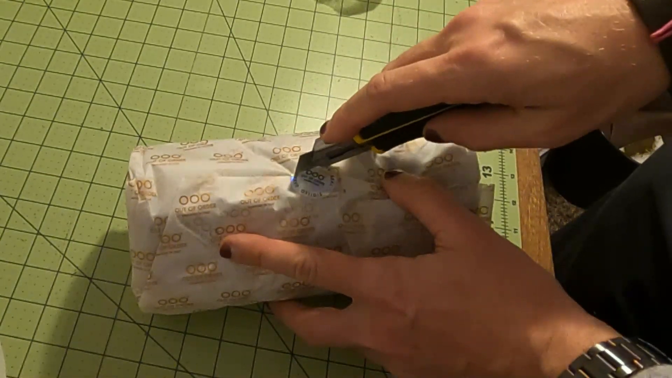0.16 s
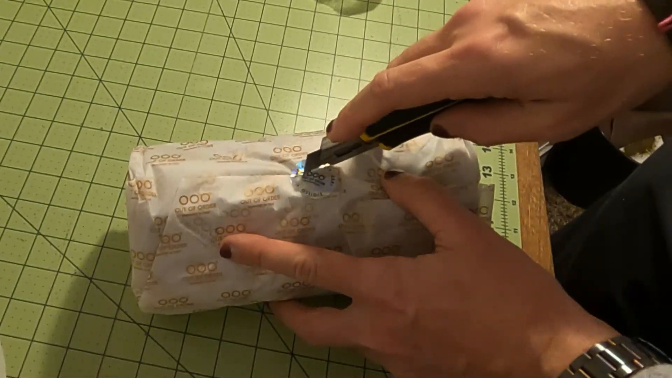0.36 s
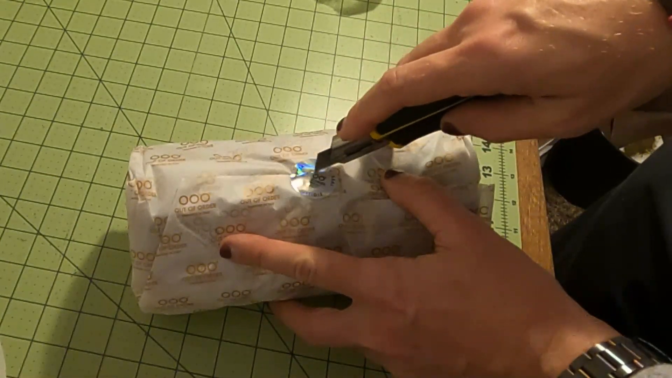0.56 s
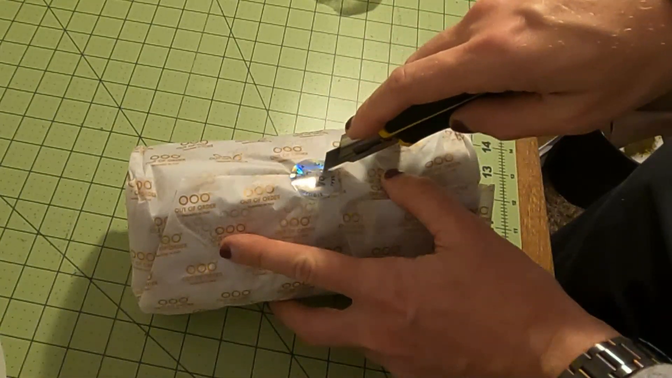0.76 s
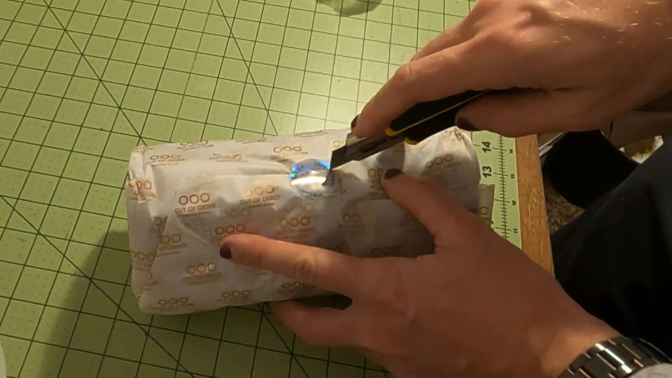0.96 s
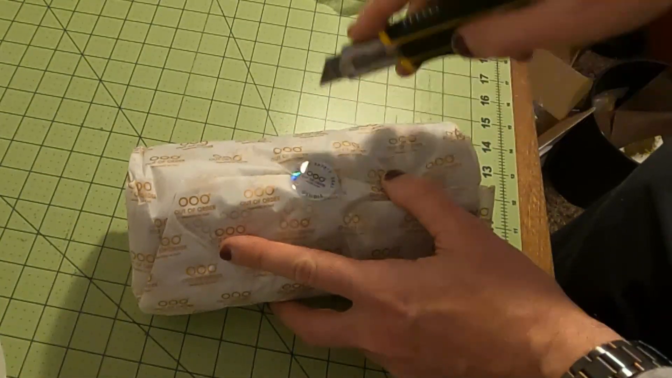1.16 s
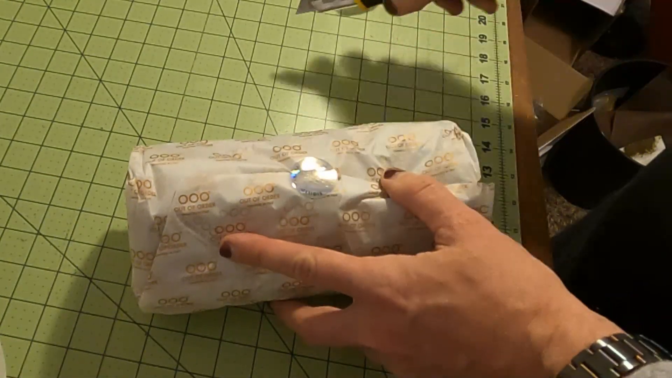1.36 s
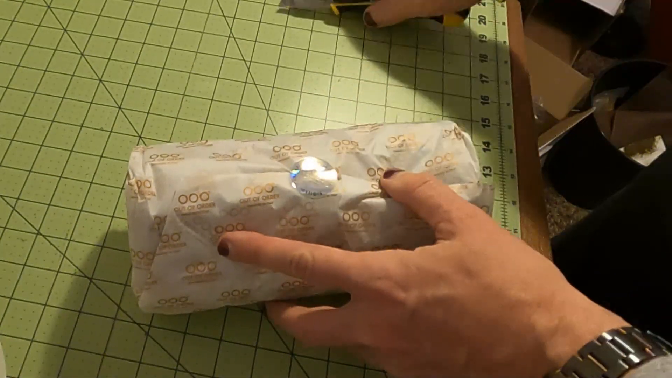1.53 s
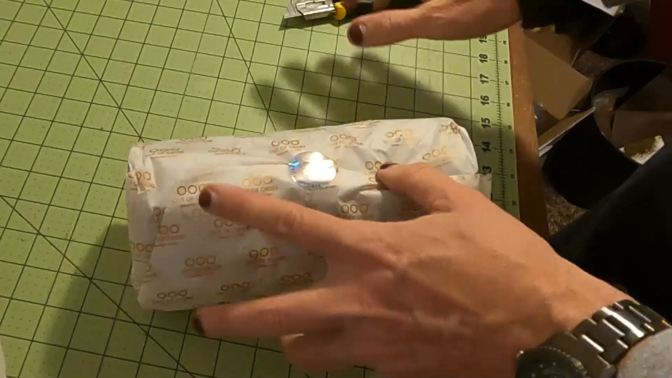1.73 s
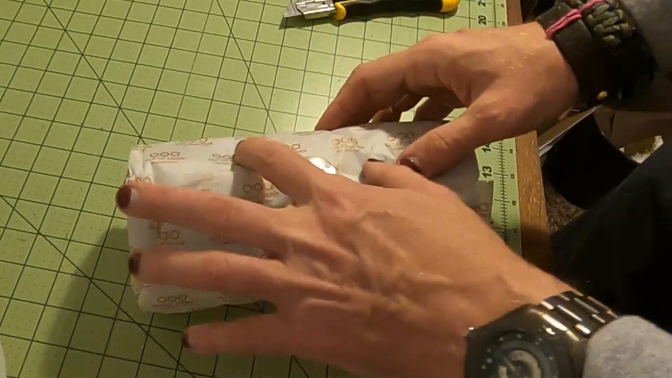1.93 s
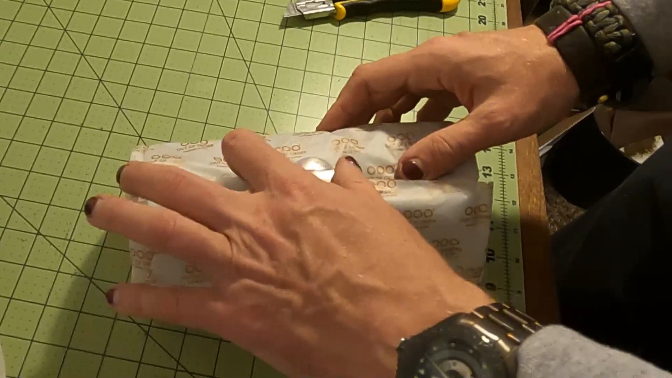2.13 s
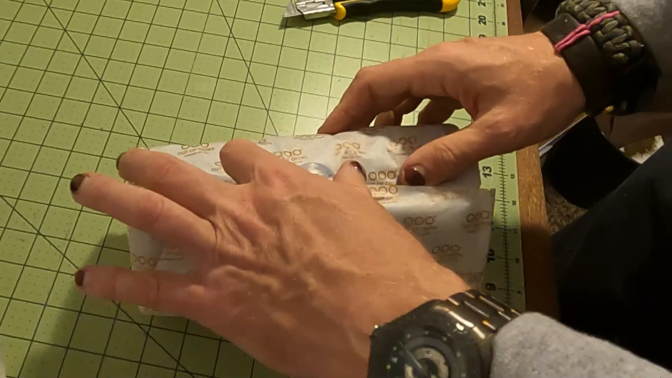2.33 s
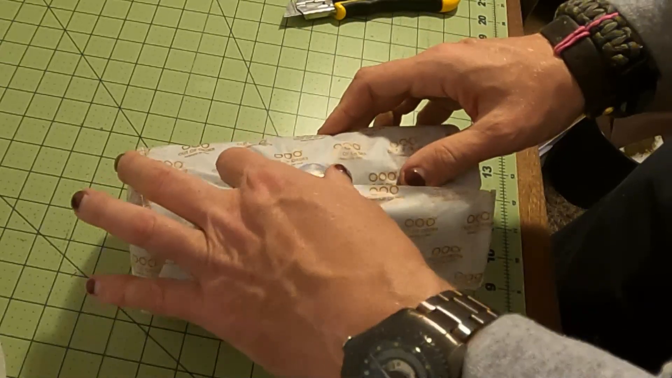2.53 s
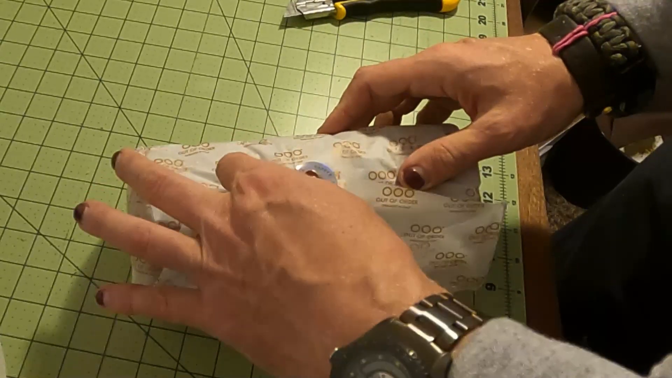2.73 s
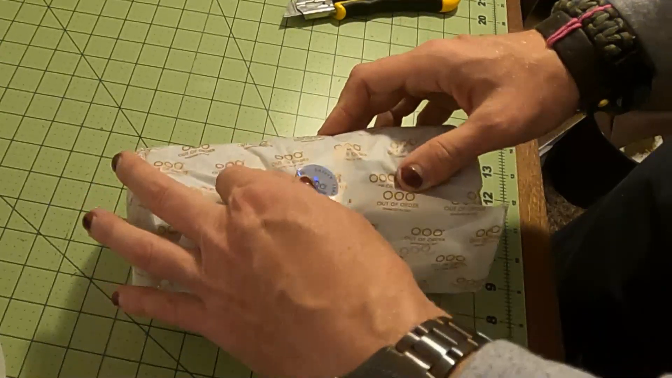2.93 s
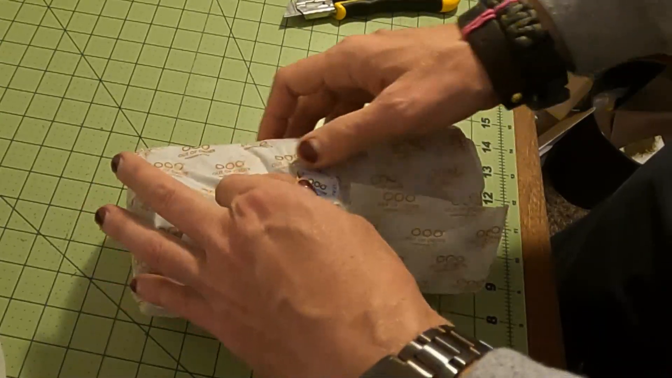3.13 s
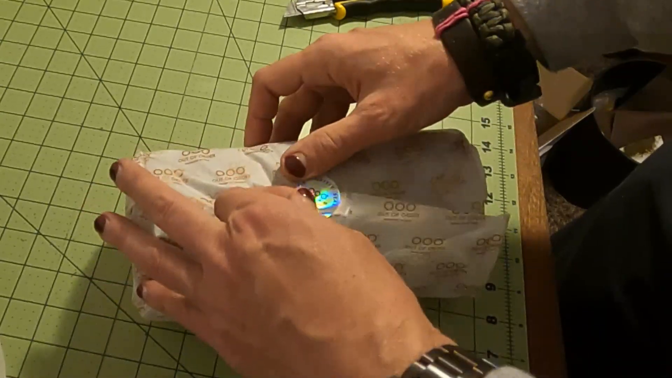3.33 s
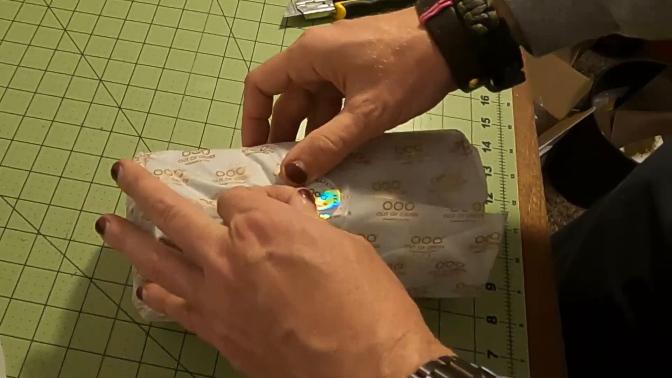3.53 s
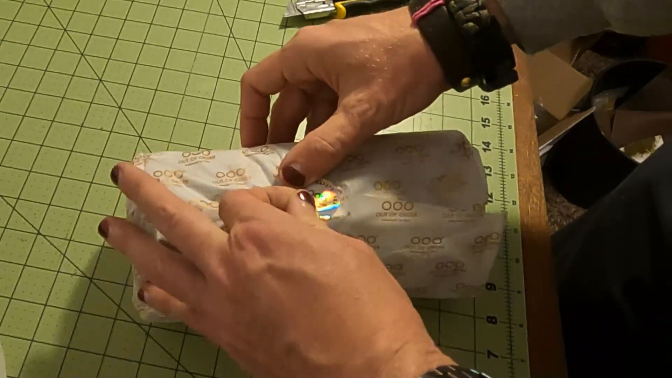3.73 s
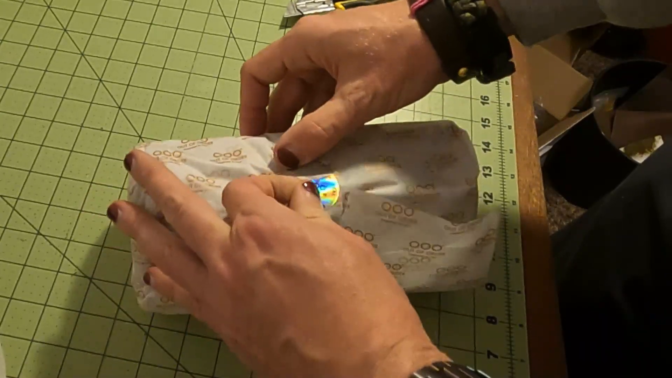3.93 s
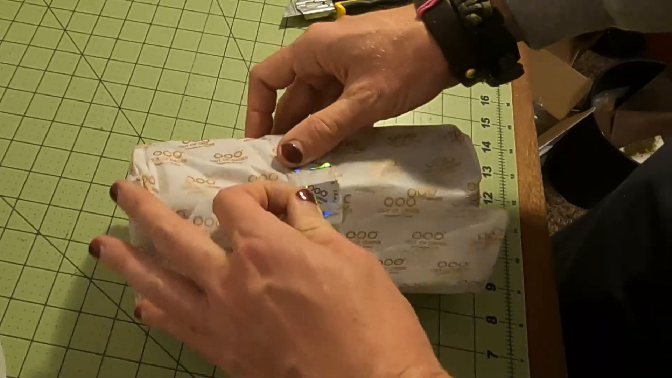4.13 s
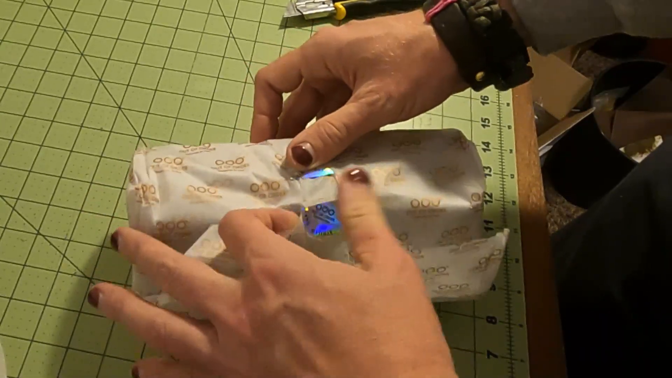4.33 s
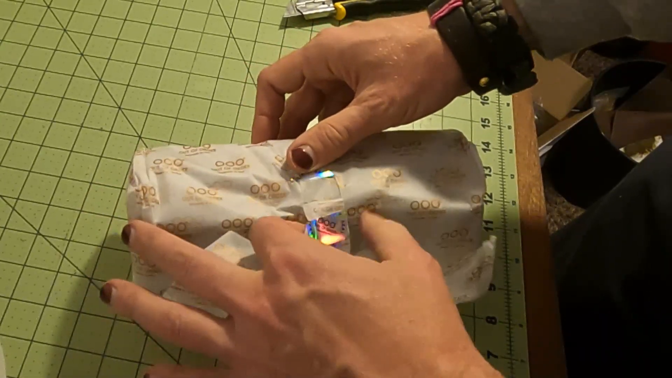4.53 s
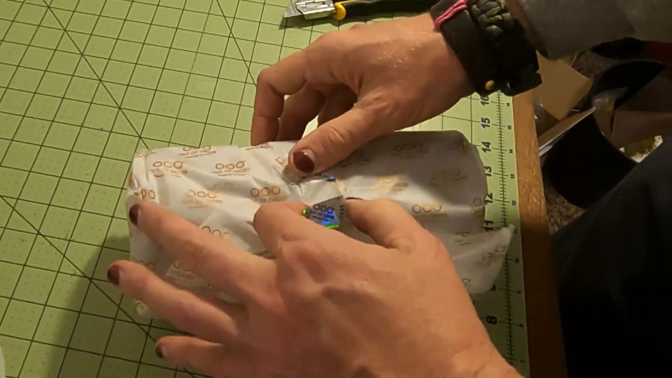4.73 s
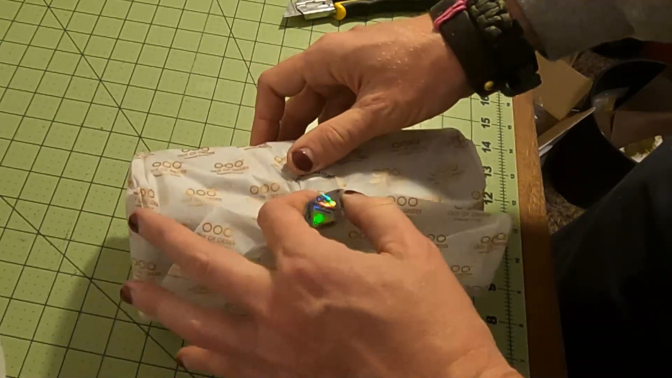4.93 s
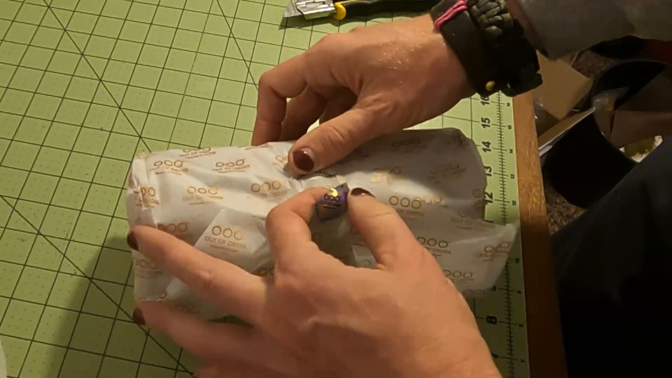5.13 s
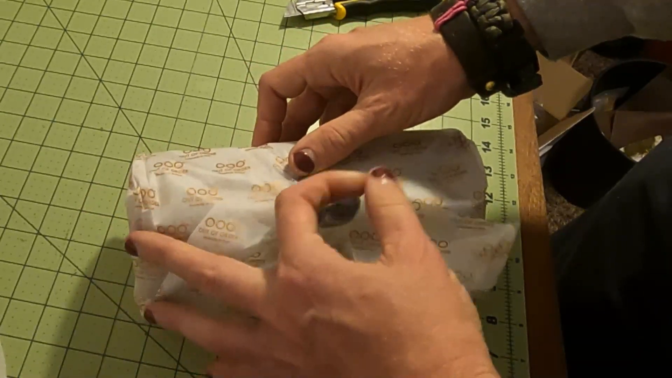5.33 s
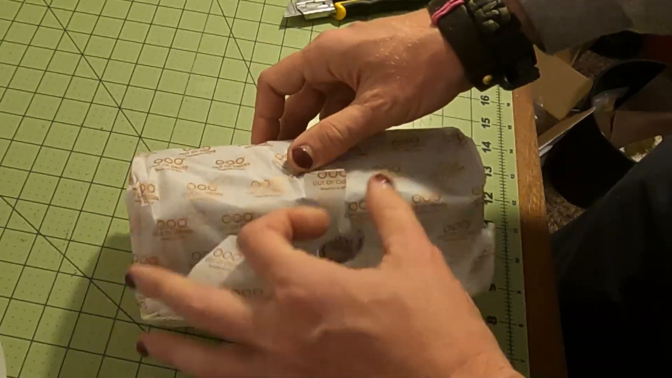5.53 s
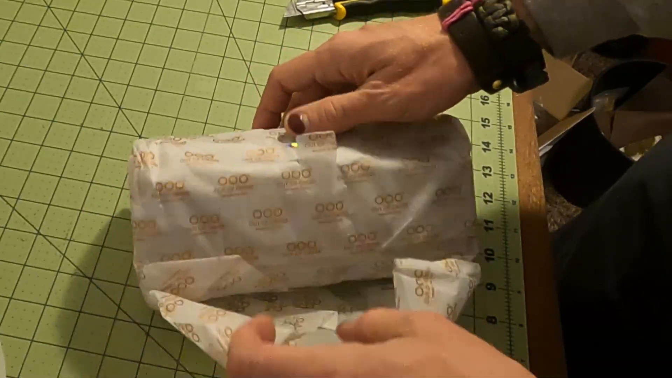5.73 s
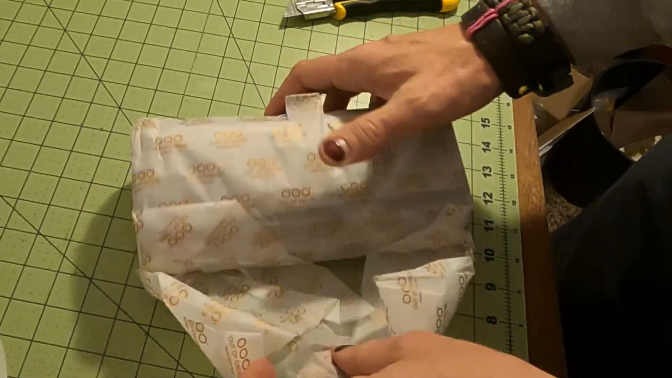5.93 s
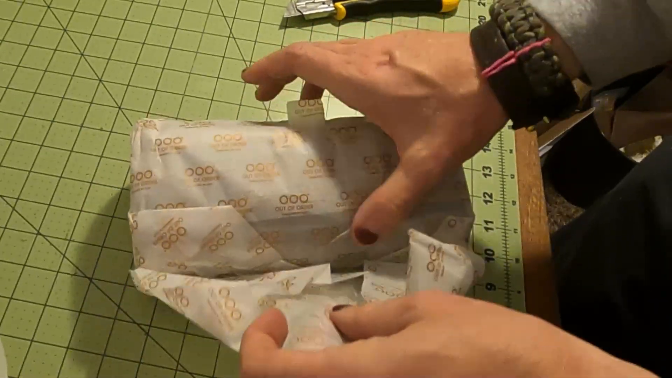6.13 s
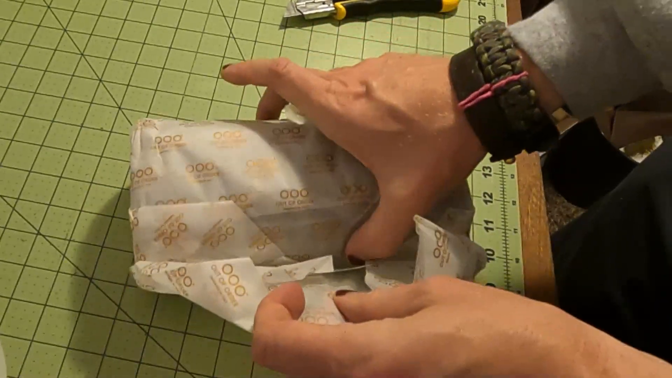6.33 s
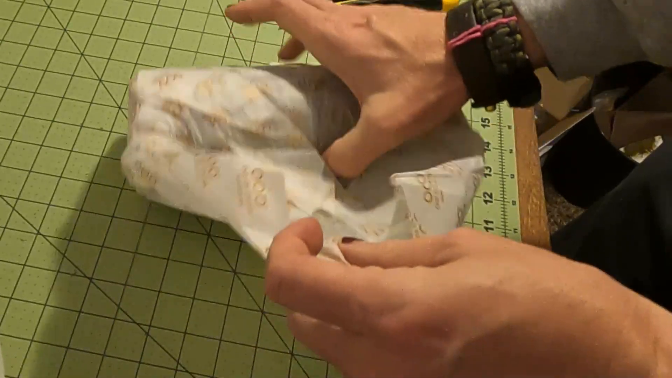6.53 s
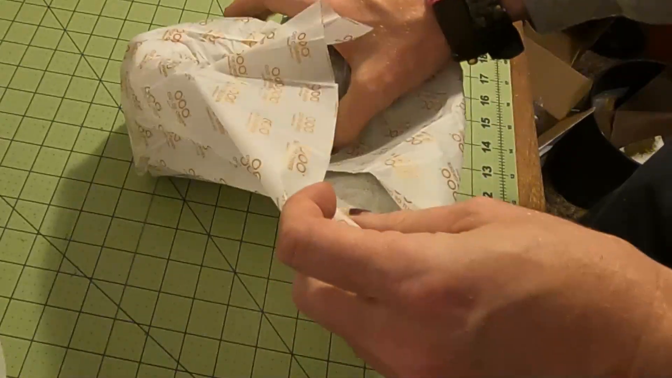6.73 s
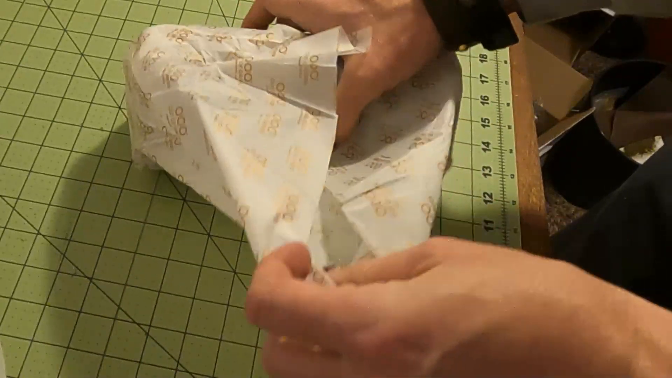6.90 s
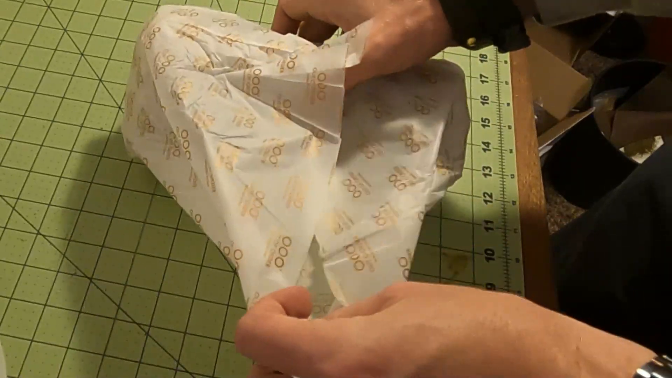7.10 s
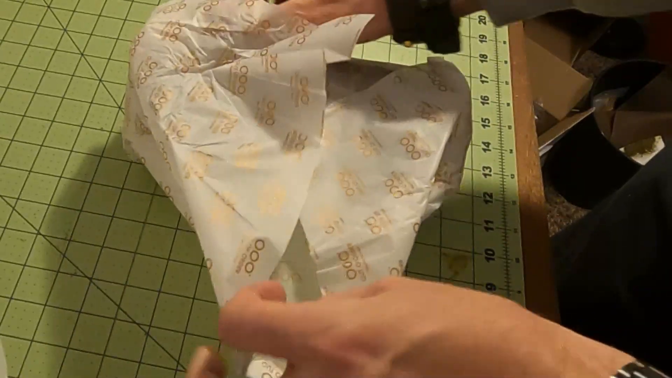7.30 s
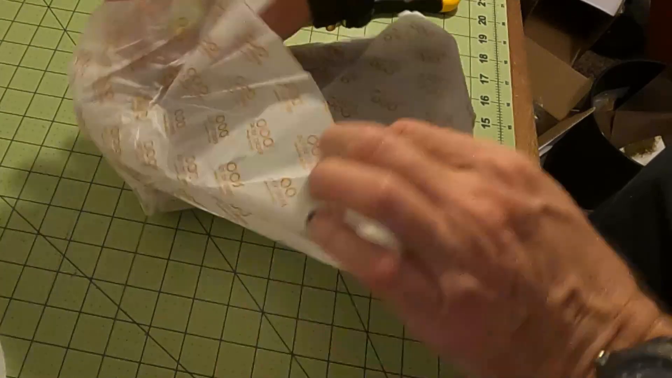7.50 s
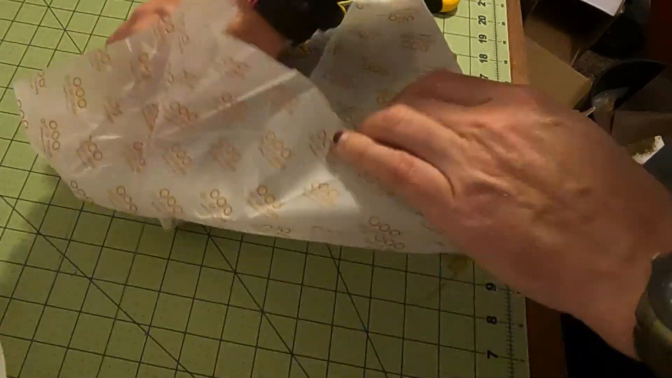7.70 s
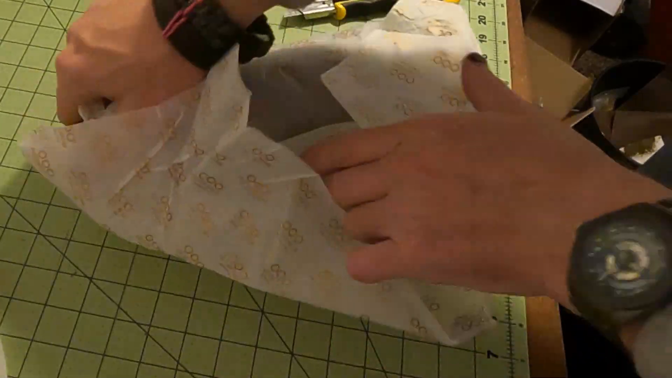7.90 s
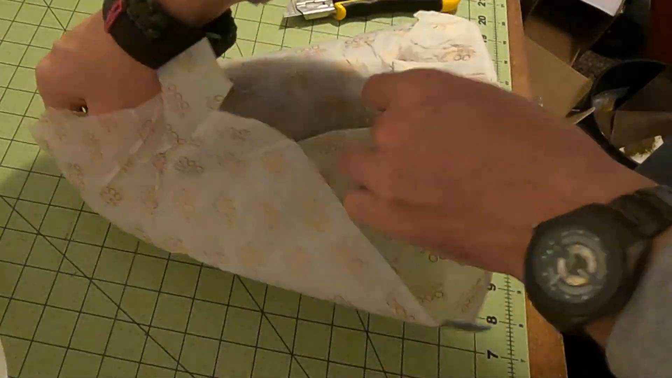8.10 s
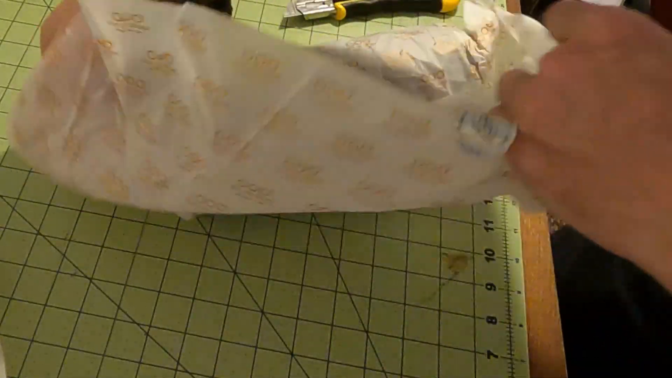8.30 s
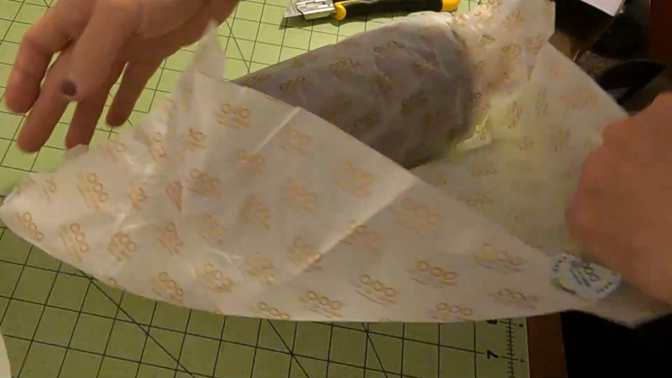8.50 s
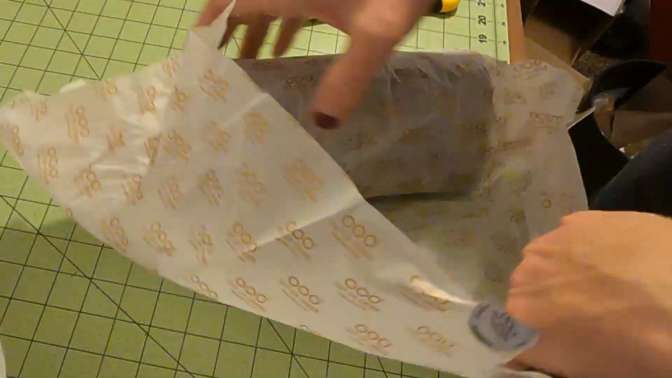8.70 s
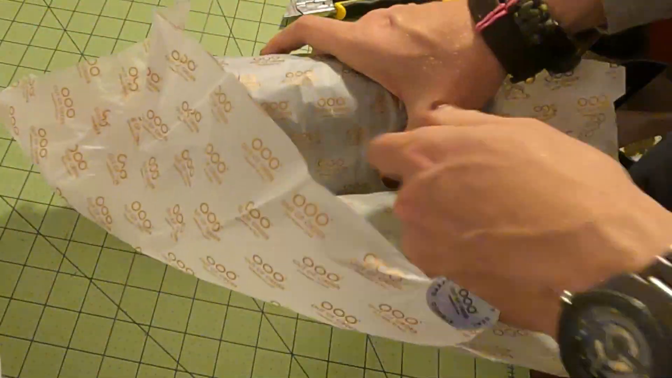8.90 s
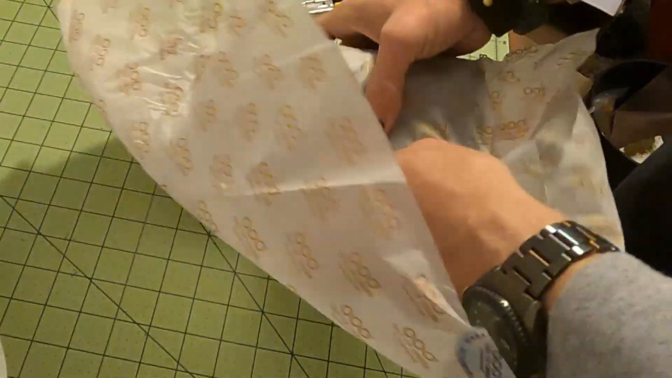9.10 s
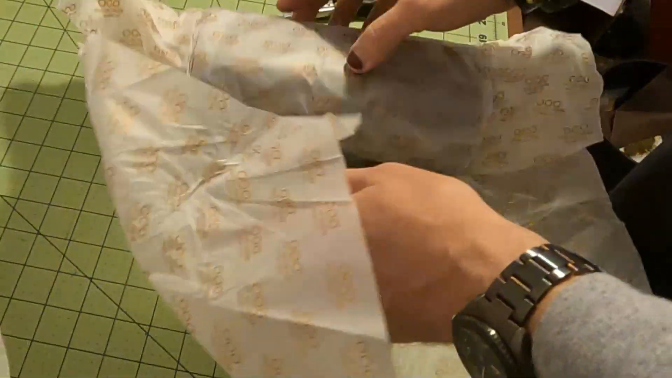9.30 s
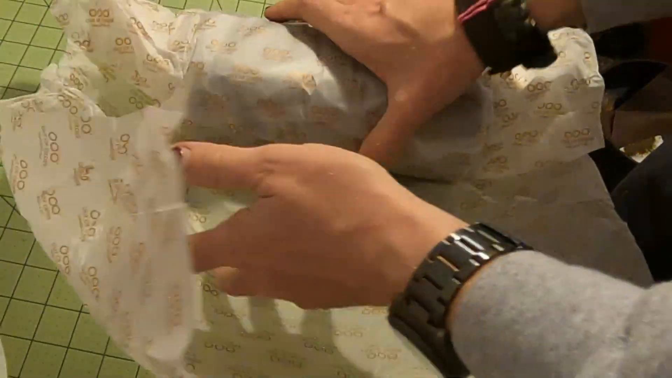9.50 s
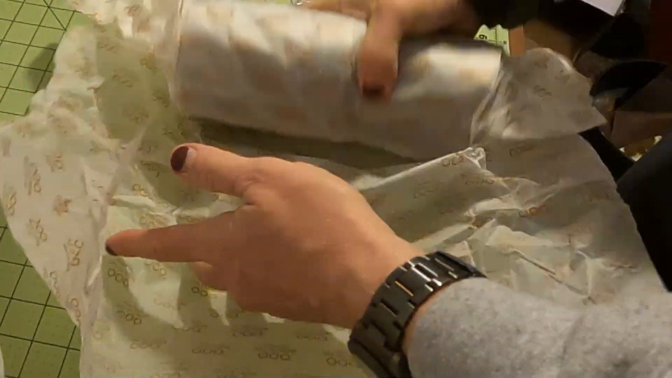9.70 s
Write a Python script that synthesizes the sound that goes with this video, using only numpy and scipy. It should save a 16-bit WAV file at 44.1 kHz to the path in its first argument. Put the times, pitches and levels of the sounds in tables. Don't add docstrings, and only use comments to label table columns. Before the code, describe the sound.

A small quiet room, heard very close in stereo, with soft ventilation and a low machine hum, deepest at the start and soon fading to a faint drone. From 0 to 1.2 s a blade slits tissue paper: light scratchy rasps and scattered crisp ticks. After a near-pause, at about 1.6 to 1.9 s the knife is laid down in a rapid rattle of hard clicks and woody table knocks, the loudest contacts here. From 2 to 3.8 s fingers pick at the paper with sparse dry crackles. A sharp snap and small knock at 3.9 s begin brisker peeling, with bright pops until 5.6 s. Then the sheet is pulled open: full, loud crinkles and sweeping rustles in quick successive gestures, dense with snaps, continuing to the end near 9.75 s. Dull, low table bumps fall around 6.6, 7.1 and 9.3 s.

```python
import sys
import numpy as np
from scipy import signal
from scipy.fft import rfft, irfft
from scipy.io import wavfile
from scipy.ndimage import uniform_filter1d

SR = 44100
rng = np.random.default_rng(int(sys.argv[2]) if len(sys.argv) > 2 else 0)


def attenuation_scalar(level_db):
    decades = np.asarray(level_db, float) / 20
    return 10 ** decades


def to_wav(s):
    ch = np.atleast_2d(s).T
    pcm = np.round(np.clip(ch, -1, 1) * 32767)
    wavfile.write(sys.argv[1], SR, pcm.astype(np.int16))


N = 429975

# start_s,
# length_s, start_level_db, end_level_db
SLITS = [(0.0, 0.015, -33, -49), (0.055, 0.13, -43.5, -47.5), (0.239, .03, -38, -51),
         (0.37, 0.052, -47.5, -44), (0.43, 0.078, -34.5, -39.5), (0.522, 0.08, -41, -37.5),
         (0.656, 0.15, -43.5, -44.5), (0.88, 0.036, -41.5, -44), (0.966, 0.069, -49, -40),
         (1.103, 0.032, -44, -36.5), (1.565, 0.06, -40, -34), (1.674, .04, -33, -37),
         (1.732, 0.062, -33, -35.5), (1.854, 0.046, -33.5, -47)]
# start_s, length_s, start_level_db, end_level_db
PICKS = [(1.959, 0.11, -34.5, -36), (2.107, 0.22, -39, -30.5), (2.304, 0.045, -28.5, -39),
         (2.454, 0.024, -30.5, -32.5), (2.571, 0.17, -31.5, -40.5), (3.045, 0.25, -35.5, -43),
         (3.282, 0.059, -34.5, -36), (3.45, 0.04, -43, -43), (3.623, 0.067, -39, -31.5),
         (3.887, 0.09, -25, -27.5), (4.01, 0.099, -35, -35), (4.147, 0.11, -25.5, -26.5),
         (4.287, 0.12, -33.5, -37), (4.573, 0.08, -43, -34), (4.715, 0.024, -22.5, -25.5),
         (4.822, 0.059, -27.5, -42), (4.943, 0.033, -36, -35), (5.065, 0.24, -33, -36),
         (5.367, 0.074, -27, -27.5), (5.491, 0.044, -31.5, -36), (5.542, 0.056, -32.5, -28.5)]
# start_s, length_s, start_level_db, end_level_db
PULLS = [(5.647, 0.13, -38, -31), (5.797, 0.041, -28.5, -22), (5.944, 0.11, -25.5, -21.5),
         (6.1, 0.14, -26, -28), (6.363, 0.24, -41.5, -23.5), (6.509, 0.12, -31.5, -21),
         (6.65, 0.17, -21, -24.5), (6.895, 0.18, -25.5, -19.5), (7.087, 0.12, -27, -31),
         (7.245, 0.029, -25, -26), (7.51, 0.26, -30, -25.5), (7.82, 0.041, -22, -18.5),
         (7.896, 0.1, -21.5, -26.5), (8.008, 0.092, -26, -20.5), (8.154, 0.18, -22.5, -26.5),
         (8.33, 0.17, -22.5, -22), (8.52, 0.17, -26.5, -24.5), (8.768, 0.14, -25.5, -25.5),
         (9.068, 0.02, -27.5, -24.5), (9.105, 0.16, -20, -20), (9.308, 0.12, -21, -24),
         (9.46, .10, -28.5, -27.5), (9.62, 0.067, -26.5, -29.5), (9.708, 0.061, -22.5, -20.5)]
# time_s, creep_db, boom_db, crisp_top_db
SHEET = [(0, -49, -17, -10), (.35, -57, -16, -11.5), (.7, -51, -6, -9), (1.2, -61, -5.5, -10.5),
         (1.5, -54, -3, -14), (1.9, -58, -8, -12), (2.1, -43, -11.5, -9.5), (3.0, -42.5, -13.5, -8),
         (3.8, -39.5, -14.5, -8), (4.5, -42.5, -12.5, -9.5), (5.6, -38, -14.5, -7), (6.4, -33.5, -9.5, -8),
         (7.4, -28.5, -13.5, -8), (8.1, -29, -9, -8.5), (9.0, -29, -12.5, -9.5), (9.75, -37, -10.5, -6.5)]
# pitch_hz, level_db
PAPER = [(120, -32), (200, -7), (380, -7.5), (700, -4.5), (1020, 6), (1300, -0.5), (2200, 1), (3660, 5.5),
         (7000, 2.5), (16000, -6.5)]
# pitch_hz, side_minus_mid_db
PORTS = [(60, -17), (110, -25), (200, -12), (380, -14.5), (700, -11), (1290, -15), (2380, -10),
         (4400, -10.5), (8120, -14), (15000, 2)]
# middle_s, length_s, level_db, pitch_hz
FACETS = [(0.006, 0.043, -46, 2240), (0.09, 0.068, -50, 8000), (0.448, 0.048, -60, 7900),
          (0.577, 0.32, -53, 520), (0.674, 0.042, -42, 3500), (1.128, 0.085, -47, 2520),
          (1.24, 0.15, -58, 1000), (1.418, 0.146, -61, 905), (2.03, 0.15, -54, 8100),
          (2.197, 0.066, -39, 2600), (2.308, 0.15, -48, 2870), (2.514, 0.22, -52, 3260),
          (2.712, 0.13, -50, 8000), (2.89, 0.055, -46, 6350), (3.188, 0.13, -46, 7600),
          (3.393, 0.074, -65, 890), (3.474, 0.071, -48, 8000), (3.625, 0.067, -51, 5040),
          (3.685, 0.038, -44, 2020), (4.207, 0.079, -35, 2350), (4.405, 0.05, -54, 4490),
          (4.513, 0.051, -63, 630), (4.623, 0.11, -45, 2660), (4.814, 0.072, -49, 630),
          (4.92, 0.085, -47, 1810), (5.027, 0.059, -52, 500), (5.155, 0.052, -54, 8000),
          (5.419, 0.05, -43, 566), (5.554, 0.055, -31, 8150), (5.857, 0.26, -38.5, 2400),
          (6.062, 0.037, -42, 850), (6.3, 0.15, -49, 635), (6.42, 0.076, -51, 1000),
          (6.898, 0.088, -54, 500), (7.25, 0.116, -40, 7850), (7.432, 0.037, -41, 720),
          (7.582, 0.082, -43, 523), (7.648, 0.037, -37, 1280), (7.726, 0.075, -43, 720),
          (7.932, 0.084, -35, 1640), (8.102, 0.04, -37, 665), (8.27, 0.088, -37, 2040),
          (8.336, 0.12, -49, 810), (8.599, 0.09, -44, 3560), (9.27, 0.041, -45, 495),
          (9.553, 0.074, -48, 500), (9.724, 0.084, -43, 500)]
# start_s, peak_db, pitch_hz
SNAPS = [(0.0473, -25.5, 2200), (0.0926, -16, 2880), (0.2233, -21, 3820), (0.301, -30, 2920),
                (0.456, -17, 5320), (0.5325, -35, 3560), (0.6647, -26, 3680), (0.992, -30, 2720),
                (1.1022, -27, 2730), (1.1168, -21, 3330), (1.28, -39, 1610), (1.296, -33.5, 4140),
                (1.6314, -18, 1960), (1.675, -20, 3350), (1.7333, -18, 2580), (1.762, -14, 1720),
                (1.84, -15, 2200), (0.548, -24, 2300), (0.671, -27, 3480), (0.838, -35, 3600),
                (0.905, -30, 2200), (1.009, -34, 2400), (1.93, -48, 3150), (1.9508, -17.5, 2890),
                (2.0179, -17, 3800), (2.158, -25, 3930), (2.2016, -21, 3220), (2.2482, -19, 3700),
              (2.266, -20, 2870), (2.2907, -27, 2800), (2.427, -28, 2770), (2.4643, -26, 4580),
              (2.491, -18.5, 3270), (2.5513, -28, 3170), (2.67, -21, 6350), (2.712, -28, 2140),
              (2.797, -29, 3750), (2.84, -24, 3520), (2.8772, -22, 5890), (2.937, -25, 7310),
              (3.2743, -24, 5120), (3.538, -19, 4860), (3.5947, -31, 5110), (3.6281, -20, 4510),
              (3.734, -23, 2900), (3.7638, -26, 4130),
                (3.864, -7.5, 2900), (3.922, -16, 4200), (3.9668, -21, 3000), (4.027, -24, 2900),
              (4.1171, -21, 3400), (4.136, -12.5, 3600), (4.326, -19, 3570), (4.404, -19.5, 4600),
              (4.4783, -23, 3050), (4.507, -22.5, 5740), (4.531, -23, 5800), (4.5577, -24, 3960),
              (4.607, -20, 2760), (4.618, -12.5, 2780), (4.6446, -22, 4130), (4.7003, -13.5, 3500),
              (4.791, -17, 4000), (4.8645, -21, 2780), (5.033, -22.5, 3470), (5.068, -16, 3010),
              (5.099, -22, 3760), (5.1296, -18, 4990), (5.1538, -6.5, 7300), (5.2226, -16.5, 4950),
              (5.245, -16, 3360), (5.296, -20, 3300), (5.349, -17.5, 3360), (5.398, -21, 3600),
              (5.417, -13, 4250), (5.506, -19.5, 4480), (5.543, -15, 3770), (5.5717, -12.5, 6400),
                (5.6015, -22, 3360), (5.6333, -23, 4740), (5.639, -23.5, 2630), (5.7154, -14.5, 4480),
              (5.773, -21, 3140), (5.8408, -18, 2170), (5.89, -10.5, 5640), (5.9646, -12, 2670),
              (6.0491, -10, 4150), (6.1033, -11, 4740), (6.1302, -13, 3060), (6.1472, -13, 3620),
              (6.1914, -22, 5040), (6.211, -22, 2840), (6.2267, -29, 2930), (6.2355, -30, 2840),
              (6.2507, -16, 6040), (6.2753, -19.5, 2410), (6.3048, -17, 5730), (6.3117, -19, 5250),
              (6.3423, -26, 3620), (6.3505, -21, 3140), (6.3588, -11.5, 6240), (6.374, -18, 7150),
              (6.3941, -21, 9100), (6.4246, -14.5, 1340), (6.4376, -20, 5510), (6.4954, -17, 7150),
              (6.5211, -15, 7150), (6.667, -7.5, 6630), (6.881, -17, 3360), (7.1087, -13, 5640),
              (7.1342, -19, 4570), (7.1429, -24, 3960), (7.222, -16, 6800), (7.2532, -15, 5860),
              (7.2601, -19, 3700), (7.3317, -24, 7190), (7.3612, -22, 2110), (7.4008, -21, 5600),
              (7.5161, -15, 5170), (7.916, -11, 3230), (7.9583, -7, 1730), (8.033, -9, 4630),
              (8.043, -15, 3100), (8.2354, -33, 2280), (8.25, -19, 2150), (8.272, -17, 4740),
              (8.6257, -10.5, 7190), (8.656, -20, 4800), (8.738, -14, 4260), (8.8216, -11, 3920),
              (9.0848, -15, 4610), (9.0927, -21, 4910), (9.4602, -13, 4600), (9.53, -14, 4690),
              (9.545, -13.5, 3230), (9.644, -15, 5300), (9.6746, -11, 5120), (9.7021, -16, 5210),
                (4.457, -25, 3000),
    (4.568, -24, 4000),
    (4.578, -21.5, 3000),
    (4.693, -20, 5000),
    (6.065, -5, 1700),
    (6.072, -16, 3500),
    (5.99, -14, 1700),
]
# time_s, level_db, pitch_hz
DRONE = [(0, -39, 61.6), (.35, -29.5, 61.2), (.95, -39, 60.5), (1.5, -34, 59.83), (2.4, -55, 60),
         (2.9, -44.5, 60.1), (4.2, -47, 60.3), (5.6, -50.5, 60.6), (7.1, -44, 64.9), (7.6, -48, 64.9),
         (9.0, -42, 64.9), (9.75, -53, 64.9)]
# pitch_hz, width_hz
DRONES = [
    (62, 2.5),
    (98, 4.4),
    (119.5, 2.2),
]
# pitch_hz, level_db
FAINT = [(80, -52), (140, -58), (162, -57), (221, -63.5)]
# middle_s, rumble_db
BUMPS = [
    (1.75, -27),
    (2.1, -66),
    (3.92, -48),
    (5.5, -47),
    (6.2, -53),
    (7.1, -38),
    (8.6, -59),
    (9.3, -36),
]
# pitch_hz, level_db
AIR = [(76, -35), (130, 10), (201, -17), (312, -9), (437, -22.5), (502, -21), (663, -29), (1050, -20),
       (1750, -23), (1900, -28), (5030, -72), (12100, -111), (15000, -77)]
# start_s, peak_db, pitch_hz, ring_time_s (60 dB)
CLACKS = [(1.8, -17, 1100, 0.012), (1.6334, -19, 2900, 0.006), (1.633, -17.5, 5200, .006),
          (1.6754, -7, 3500, 0.0059), (1.6744, -14.5, 5700, 0.0046), (1.6752, -34, 900, .006),
          (1.709, -18, 3600, 0.0068), (1.7319, -12, 2620, 0.0052), (1.733, -24, 4500, .006),
          (1.7346, -7, 640, 0.0079), (1.76, -14, 2540, 0.0058), (1.7597, -23, 4400, 0.0055),
          (1.759, -18.5, 5200, 0.0065), (1.761, -18, 7400, 0.0046), (1.7608, -5, 520, 0.0075),
          (1.6, -33, 1350, 0.0074), (1.6, -25, 3400, 0.0063), (1.6, -21, 2000, 0.0082),
          (3.8637, -20, 3060, .007), (3.8634, -19, 1450, 0.019), (3.8653, -12, 302, 0.027),
          (3.8638, -18.5, 560, 0.019), (5.4268, -21.5, 450, 0.014), (5.4257, -16.5, 950, 0.01),
          (4.5, -18, 2800, 0.0067), (9.507, -35, 328, 0.23), (1.7445, -13, 244, 0.056),
          (1.7915, -9, 140, .05), (3.886, -25.5, 164, 0.17)]
# pitch_hz, level_db, ring_time_s (60 dB)
HANDLE = [(820, -6, .015), (1040, -9, .015), (1470, -12, .015), (1710, -10, 0.021), (2040, -14, 0.011),
          (2500, -17, 0.011), (3330, -24, 0.0093)]
# start_s, peak_db, struck_spot_pitch_hz, ring_time_s, focus_db (per octave squared)
KNOCKS = [(1.633, -7, 214, 0.14, 0.5), (1.673, -7, 161, 0.29, 2), (1.699, -18, 143, 0.23, -0.5),
          (1.734, -2.5, 289, 0.15, 1.5), (1.759, -3, 260, 0.2, 1.5), (1.787, -9.5, 142, 0.35, 14),
          (1.837, -9.5, 312, 0.18, 2.5), (1.869, -15, 142, 0.2, 0.5), (1.95, -26.5, 150, 0.11, 3),
          (3.864, -23, 322, 0.053, 2), (5.4256, -21, 300, 0.044, 2), (6.62, -18.5, 143, 0.047, -3),
          (7.049, -29, 221, 0.13, -8), (7.549, -25, 178, 0.17, -4), (8.154, -27, 280, 0.16, 21),
          (8.449, -25, 276, 0.17, 29), (9.257, -17.5, 141, 0.32, 0), (9.516, -41, 144, 0.17, -5)]
# pitch_hz, level_db (per Hz)
TABLE = [(29, -35), (62, 0), (123, -4.5), (330, -4), (393, -13), (441, -7.5), (486, -11.5), (600, -12),
         (1340, -21), (2500, -25.5), (3250, -60), (5500, -120)]
# pitch_hz, level_db
MIC = [(7400, 0), (8250, -5.5), (9600, -2), (10800, -9), (12300, -9), (13300, -19), (15000, -11),
       (15900, -22)]


def rms_one(x):
    return x / np.sqrt(np.mean(x ** 2) + 1e-20)


def in_time(rows):
    s, *columns = np.transpose(rows)
    return [np.interp(np.arange(N) / SR, s, c) for c in columns]


def colour(x, *spectra):
    hz = np.maximum(np.arange(4097) * SR / 8192, 1)
    db = 0
    for spectrum in spectra:
        curve_hz, curve_db = np.transpose(spectrum)
        db = db + np.interp(np.log(hz), np.log(curve_hz), curve_db)
    cepstrum = irfft(db * np.log(10) / 20)
    cepstrum[1:4096] *= 2
    cepstrum[4097:] = 0
    return signal.oaconvolve(x, irfft(np.exp(rfft(cepstrum))))[:N]


def band(x, kind, hz):
    return signal.sosfilt(signal.butter(2, hz, kind, fs=SR, output="sos"), x)


def drift(rate_hz):
    r = np.exp(-80 * np.pi * rate_hz / SR)
    noise = rng.standard_normal(N // 40 + 2002)
    slow = signal.lfilter([1], [1, -2 * r, r * r], noise)[2000:]
    return np.interp(np.arange(N) / 40, np.arange(len(slow)), rms_one(slow))


def ring(clicks, hz, t60):
    r, w = attenuation_scalar(-60 / (t60 * SR)), 2 * np.pi * hz / SR
    return signal.lfilter([0, np.sin(w)], [1, -2 * r * np.cos(w), r * r], clicks + 1e-18)


def ports(mid, side):
    return np.array([mid + side, mid - side])


def handling():
    rise_db_per_s, fall_db_per_s = 403, 259
    creep_db, boom_db, top_db = in_time(SHEET)
    power, t = attenuation_scalar(2 * creep_db), np.arange(N) / SR
    for s, length, start_db, end_db in SLITS + PICKS + PULLS:
        times = [s - .2, s, s + length, s + length + .2]
        levels = [start_db - rise_db_per_s / 5, start_db, end_db, end_db - fall_db_per_s / 5]
        power += attenuation_scalar(2 * np.interp(t, times, levels))
    return 10 * np.log10(power), boom_db, top_db


def buckles(per_s, spread_db, t60, clump_db):
    clumps = attenuation_scalar(clump_db * (drift(9.0) + drift(35.0)))
    born = rng.random(N) < per_s * clumps / SR
    sizes = attenuation_scalar(spread_db * np.minimum(rng.exponential(1, N), 3.4))
    return signal.lfilter([1], [1, -attenuation_scalar(-60 / (t60 * SR))], born * sizes + 1e-9)


def patchy(x):
    out = x
    for hz in (1520, 2400, 4000, 6600):
        swell = attenuation_scalar(1 * drift(7.8)) - 1
        out = out + swell * band(x, "band", [hz / 1.46, hz * 1.38])
    return out


def pops(level_db):
    born = rng.random(N) < 500 * attenuation_scalar(.4 * (level_db + 30) + 3.0 * drift(20.0)) / SR
    sizes = attenuation_scalar(2.6 * np.minimum(rng.exponential(1, N), 4)) * rng.choice([-1, 1], N) * born
    dealt = rng.integers(0, 12, N)
    rings = []
    for k, hz in enumerate(np.geomspace(1500, 9500, 12)):
        rings.append(ring(sizes * (dealt == k), hz, 7.0 / hz) * (hz / 3000) ** 0.52)
    both = ports(sum(rings), 0.3 * (sum(rings[::2]) - sum(rings[1::2])))
    return both / np.std(both) * attenuation_scalar(-.2 * (level_db + 34.0))


def facets(grain):
    out, width = np.zeros((2, N)), 1.27
    for s, length, db, hz in FACETS:
        i = np.arange(max(round((s - .15) * SR), 0), min(round((s + .15) * SR), N))
        swell = np.exp(-((i / SR - s) / (0.3 * length)) ** 2)
        noise = rms_one(band(grain[:, i], "band", [hz / width, hz * width]))
        out[:, i] += attenuation_scalar(db) * swell * noise
    return out


def crackle():
    smooth_from_s, smooth_to_s = 1.55, 1.63
    blade_from_s, blade_to_s, blade_db = 0.54, 1.03, -5.5
    level_db, boom_db, top_db = handling()
    slide = 1.46 * attenuation_scalar(1.26 * (level_db + 30.5))
    busy = attenuation_scalar(0.16 * (level_db + 28.5))
    ticks = rms_one(buckles(900 * busy, 5.9, 0.0045, 1.2) / np.sqrt(busy))
    crunches = rms_one(buckles(110, 3.4, 0.035, 4.1))
    gate = ticks + 1.7 * crunches + slide
    gate /= np.sqrt(uniform_filter1d(gate ** 2, size=SR // 14)) ** 0.66
    gate[round(smooth_from_s * SR):round(smooth_to_s * SR)] = 1.0

    mid, side = rng.standard_normal((2, N)) * gate
    sheet = ports(colour(mid, PAPER), colour(side, PAPER, PORTS))
    boom = attenuation_scalar(boom_db + 9.0) * band(sheet, "low", 2220)
    top = attenuation_scalar(top_db + 11.0) * band(sheet, "high", 7450)
    body = patchy(band(band(sheet, "high", 1280), "low", 10480))
    blade_times = [blade_from_s - .04, blade_from_s, blade_to_s, blade_to_s + .04]
    blade_on = np.interp(np.arange(N) / SR, blade_times, [0, 1, 1, 0])
    rasp = attenuation_scalar(blade_db) * blade_on * band(sheet, "band", [1800, 5200])
    mix = (body + rasp + boom + top) / np.std(body)
    level = attenuation_scalar(level_db - 0.5 + np.array([[-.3], [.3]]))
    return level * (mix + 0.36 * pops(level_db)) + facets(ports(mid, 0.3 * side))


def snaps():
    out, t = np.zeros((2, N)), np.arange(2200) / SR
    for s, peak_db, hz in SNAPS:
        mid, side = rng.standard_normal((2, len(t)))
        body_s = 0.0045 + 0.0013 * rng.random()
        pan_db = rng.normal(-1.4, 2)
        fade = np.exp(-t / 0.00064) + 0.53 * np.exp(-t / body_s) + 0.085 * np.exp(-t / 0.0098)
        burst = ports(mid, 0.25 * side) * fade
        pitched = band(burst, "band", [hz / 1.69, min(hz * 1.5, 11000)])
        burst = pitched + 0.85 * band(burst, "band", [900, 11500])
        burst = band(burst, "low", 17400)
        burst *= attenuation_scalar(peak_db + 1.04 + np.array([[.5], [-.5]]) * pan_db) / np.abs(burst).max()
        i = round(s * SR)
        out[:, i:i + len(t)] += burst[:, :N - i]
    return out


def hum():
    low_db, low_hz = in_time(DRONE)
    t = np.arange(N) / SR
    bumps = sum(attenuation_scalar(db - 85 * np.abs(t - s)) for s, db in BUMPS)
    middle = attenuation_scalar(np.maximum(-41.5 - 3.5 * t, -64)) + attenuation_scalar(-8.5) * bumps
    gains = [attenuation_scalar(low_db), middle, attenuation_scalar(-39.5)]
    turns = [np.cumsum(low_hz) / SR, DRONES[1][0] * t, DRONES[2][0] * t]
    out = 0
    for (hz, width_hz), gain, turn in zip(DRONES, gains, turns):
        waver = rms_one(ring(rng.standard_normal(N), hz, 8.1 / width_hz))
        out = out + gain * rms_one(1.28 * np.sin(2 * np.pi * turn) + 0.5 * waver)
    for hz, db in FAINT:
        out = out + attenuation_scalar(db) * rms_one(ring(rng.standard_normal(N), hz, 0.97))
    rumble = band(band(rng.standard_normal(N), "band", [26, 48]), "band", [26, 48])
    wash = band(rng.standard_normal(N), "band", [50, 175])
    return out + (attenuation_scalar(-58.5) + bumps) * rms_one(rumble) + attenuation_scalar(-50.5) * rms_one(wash)


def air():
    mid, side = rng.standard_normal((2, N))
    return attenuation_scalar(-45.5) * rms_one(ports(colour(mid, AIR), colour(side, AIR, PORTS)))


def clacks():
    rattle_from_s, rattle_to_s, heavy_under_hz = 1.4, 1.87, 2000
    chatter_per_s, chatter_db = 520, -37.5
    out, shake, t = np.zeros(N), np.zeros(N), np.arange(SR // 8) / SR
    for s, peak_db, hz, t60 in CLACKS:
        i = round(s * SR)
        out[i:i + len(t)] -= attenuation_scalar(peak_db - 60 * t / max(t60, .002)) * np.sin(2 * np.pi * hz * t)
        if rattle_from_s <= s + .01 <= rattle_to_s and hz < heavy_under_hz:
            shake[i:i + len(t)] += attenuation_scalar(0.32 * (peak_db + 9) - 60 * t / 0.19)
    touches = shake * (rng.random(N) < chatter_per_s / SR)
    chatter = 0
    for hz, db, t60 in HANDLE:
        chatter = chatter + attenuation_scalar(db) * ring(touches * rng.standard_normal(N), hz, t60)
    return out + attenuation_scalar(chatter_db + 8.5) * chatter


def knocks():
    out, t = np.zeros(N), np.arange(SR // 4) / SR
    hz = np.geomspace(55, 2400, 60)[:, None] * attenuation_scalar(rng.normal(0, 0.12, (60, 1)))
    table_hz, table_db = np.transpose(TABLE)
    shape_db = np.interp(np.log(hz), np.log(table_hz), table_db) + 10 * np.log10(hz)
    luck = rng.standard_normal((len(KNOCKS), len(hz), 1))
    for (s, peak_db, spot_hz, t60, focus_db), chance in zip(KNOCKS, luck):
        decay = attenuation_scalar(-60 * t / max(t60, .02) * (hz / 250) ** 0.42)
        onset = 1 - np.exp(-t * hz * 1.8)
        octaves_squared = np.minimum(np.log2(hz / spot_hz) ** 2, 6)
        strength = chance * attenuation_scalar(shape_db - max(focus_db, -1.5) * octaves_squared)
        blow = (strength * decay * onset * np.sin(2 * np.pi * hz * t)).sum(axis=0)
        i = round(s * SR)
        out[i:i + len(t)] += (attenuation_scalar(peak_db - 4.5) * blow / np.abs(blow).max())[:N - i]
    return out


def room(x):
    t = np.arange(SR // 2) / SR
    fade = attenuation_scalar(-60 * t / 0.31) * (t > .004)
    mid, side = band(rng.standard_normal((2, len(t))), "low", 9200) * fade
    tails = ports(mid, 0.64 * side) / np.sqrt(np.sum(mid ** 2))
    return attenuation_scalar(-16.5) * signal.oaconvolve(x[None], tails, axes=1)[:, :N]


def scene():
    paper = crackle() + snaps()
    low, floor = hum(), air()
    table = (knocks() + clacks()) * attenuation_scalar([[-.6], [.6]])
    near = paper + table
    machines = ports(low, 0.038 * np.roll(low, 300)) * attenuation_scalar([[-.3], [.3]])
    return near + room(near.mean(axis=0)) + machines + floor


def band_limit(x):
    return signal.sosfilt(signal.butter(12, 15930, fs=SR, output="sos"), x)


def record(dry):
    tilt = band(dry, "high", 4600) * np.array([[.15], [-.15]])
    heard = np.array([colour(port, MIC) for port in dry + tilt])
    rounded = band(0.89 * np.tanh(heard / 0.87), "high", 25)
    mix = signal.sosfilt(signal.cheby2(10, 60, 16000, fs=SR, output="sos"), rounded)
    return band_limit(mix)


dry = scene()
out = record(dry)
to_wav(out)
```